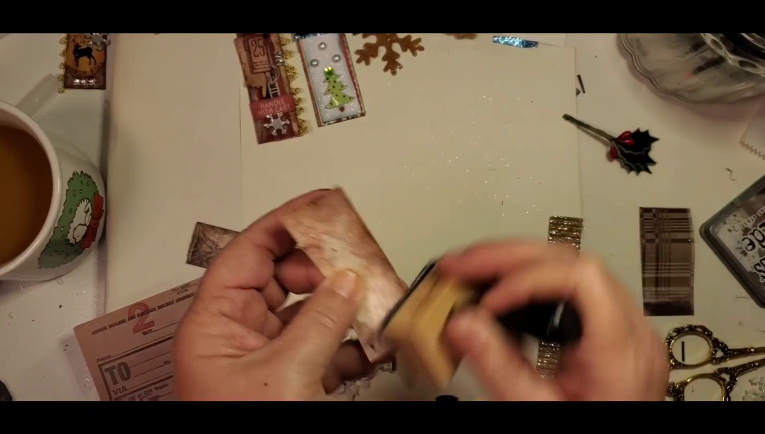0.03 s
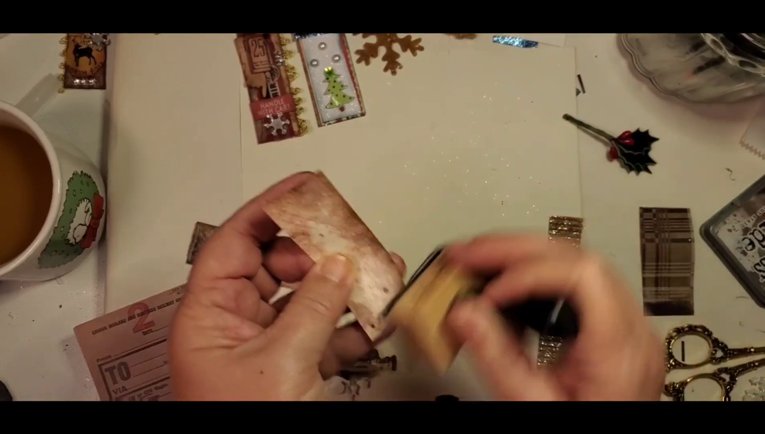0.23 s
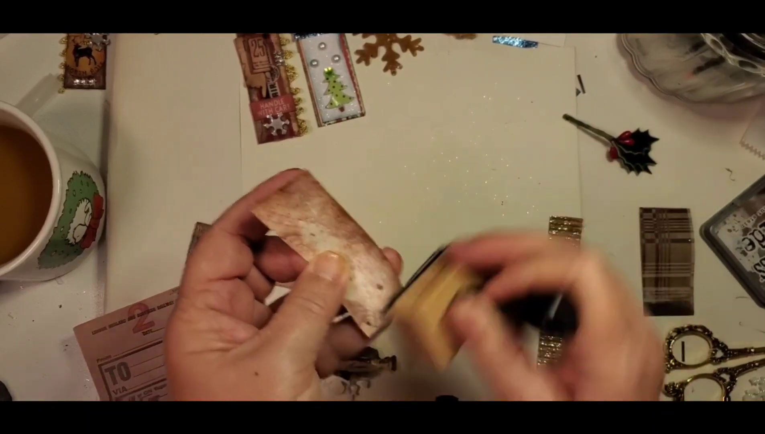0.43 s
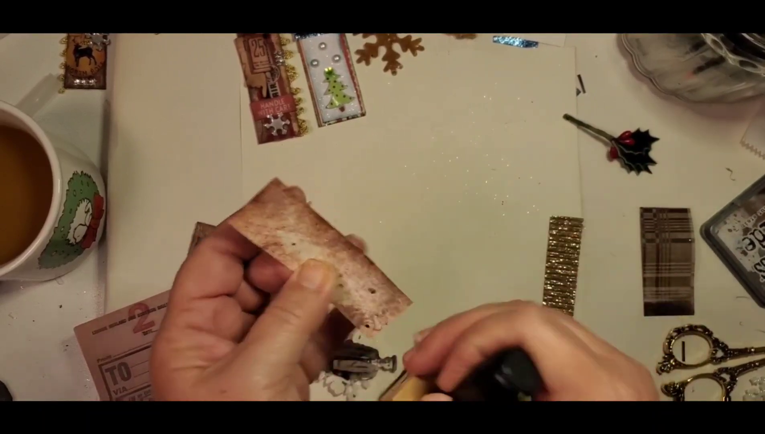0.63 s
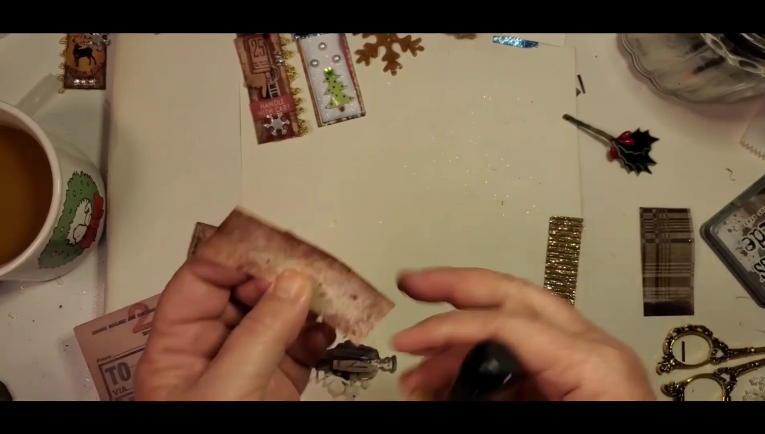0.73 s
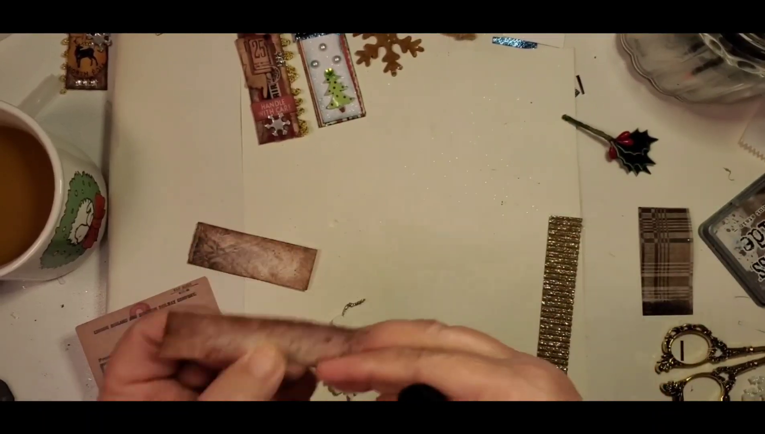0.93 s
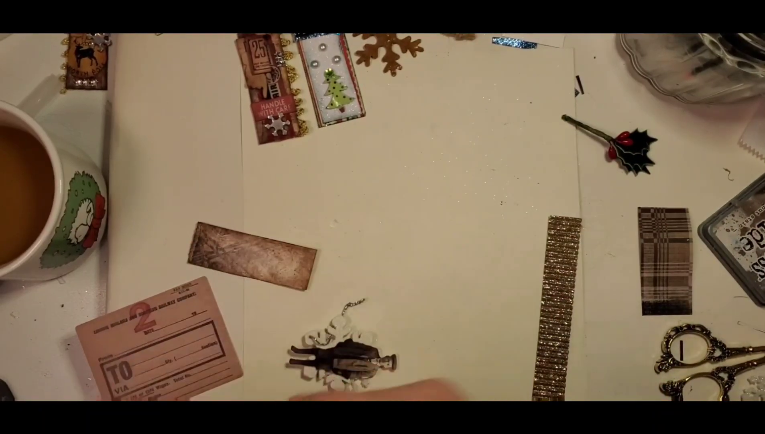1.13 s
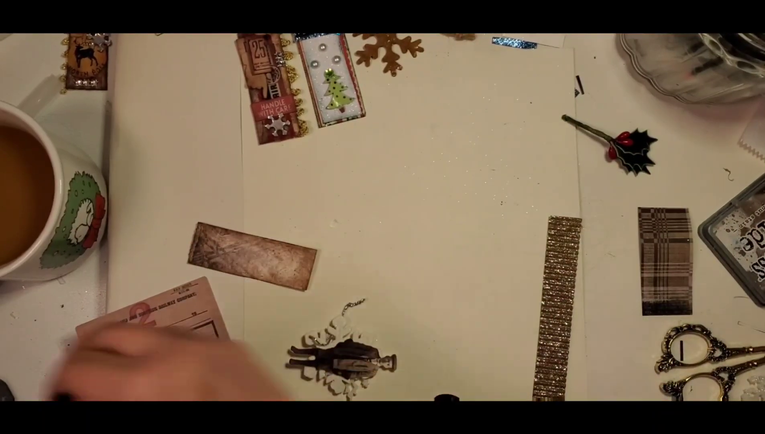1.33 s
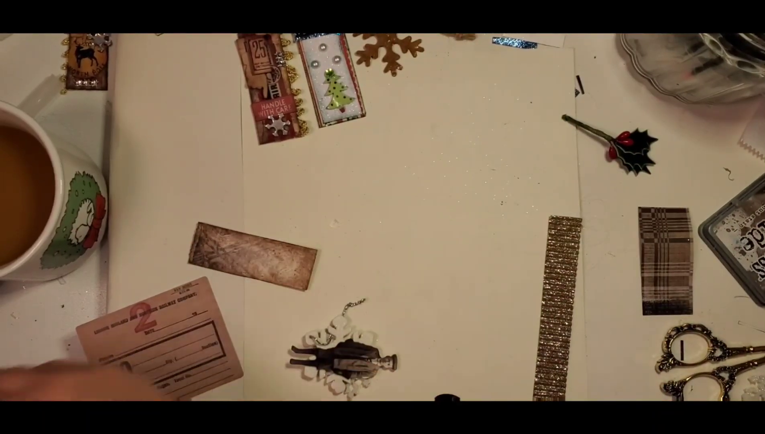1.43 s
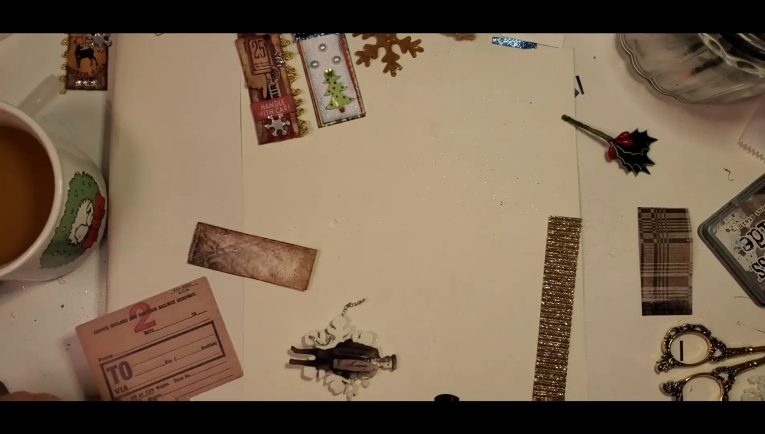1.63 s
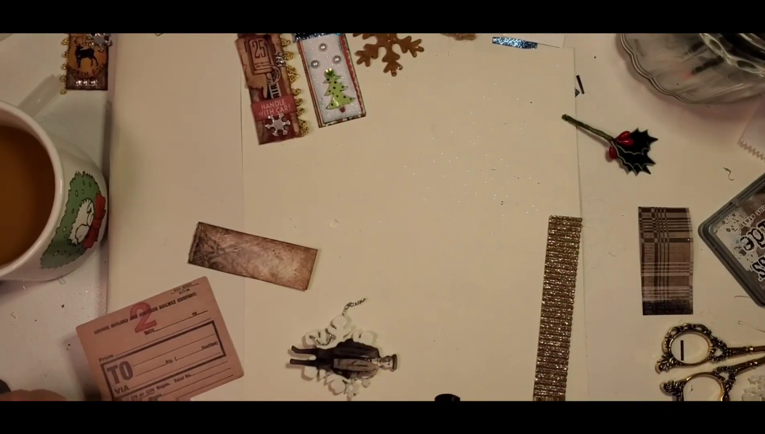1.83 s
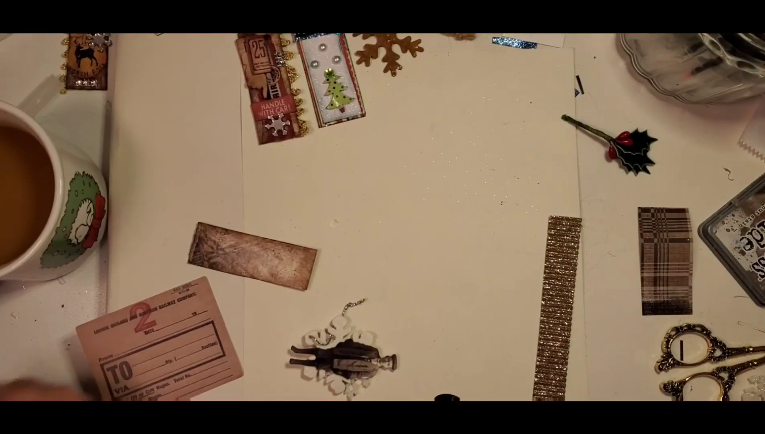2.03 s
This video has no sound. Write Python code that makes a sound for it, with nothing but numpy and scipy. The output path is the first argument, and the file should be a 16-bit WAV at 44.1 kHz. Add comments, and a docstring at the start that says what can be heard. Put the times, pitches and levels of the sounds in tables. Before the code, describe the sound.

Four quick, crisp flicks of foam against a paper card, followed by faint paper handling.

```python
"""A foam blending tool flicks four times over the edge of a small paper card, above a craft table.
Each stroke hisses along the paper, catches, and lets the card snap free with a bright crackle
and a short, low flex. Then hands and paper slide and rustle softly at the table's edge, with a few
dull bumps. A small room answers it all, over a bed of faint room noise and mains hum."""
import sys
import numpy as np
from scipy import signal
from scipy.fft import rfft, irfft
from scipy.io import wavfile
from scipy.ndimage import uniform_filter1d

SR = 44100
rng = np.random.default_rng(int(sys.argv[2]) if len(sys.argv) > 2 else 0)


def output_pcm(signal):
    """Save a mono or channel-first signal as 16-bit PCM at the path in sys.argv[1].

    Samples are clipped to [-1, 1] before scaling.
    """
    pcm = np.clip(np.atleast_2d(signal).T, -1, 1) * 32767
    wavfile.write(sys.argv[1], SR, np.round(pcm).astype(np.int16))


N = 92610
T = np.arange(N) / SR
HZ = np.fft.rfftfreq(4096, 1 / SR)

# The flicks. Each row: release time and crackle length in seconds, snap and flex gains in dB,
# EQ at 1.5, 4 and 12 kHz in dB, rub length in seconds, rub gain in dB, leftward pan in dB.
STROKES = [(0.0794, .0042, -20.5, -11, -6, 2.5, 2.5, .044, -44, -1),
           (0.2655, 0.0038, -18.5, -3.5, -8, -1.5, -2.5, 0.05, -49.5, -1),
           (.4613, 0.004, -23, 2, -1.5, -6.5, 1.5, 0.049, -47, -1),
           (0.6565, .0016, -23, -1.5, 1, -9.5, -2, 0.051, -48.5, -0.5)]
# Tone of the snap. Each row: frequency in Hz, gain in dB.
SNAP_EQ = [(100, -27), (400, -10), (850, -19.5), (1500, -6), (2200, -10), (3500, -1.5), (5600, -1.5),
           (9500, 0), (13000, 1), (15500, -5.5)]
# The card's resonances. Each row: centre in Hz, width in Hz, boost in dB.
CARD_PEAKS = [(1120, 170, 6), (1587, 290, 8.5), (1869, 290, 8), (2560, 240, 12), (2975, 170, 5.5),
              (3706, 900, 4.5), (4140, 480, 3), (6800, 640, 4.5), (9600, 820, 2.5), (12100, 600, 3.5)]
# What each stroke's grip brings out. Each row: two peaks, with centre and width in Hz, boost in dB.
GRIP_PEAKS = [
    [(1680, 400, 9.5), (5000, 340, 7.5)],
    [(3680, 1000, 6), (8800, 1800, 4.5)],
    [(2600, 170, 0.5), (9620, 600, 4)],
    [(3420, 700, 9), (9280, 1400, 6.5)],
]
# The whole card bending. Each row: pitch in Hz, level in dB, 60 dB decay time in seconds.
FLEX_MODES = [(210, -46.5, 0.024), (441, -36, .022), (513, -34.5, 0.006), (680, -39.5, .02)]
# The card's edge ticking on the tool. Each row: start in seconds, gain in dB, cutoff in Hz.
EDGE_TICKS = [(0.0794, -31.5, 2000), (0.4687, -27.5, 8900), (0.6626, -32.5, 8850)]
# Where the card sits in the stereo image. Each row: frequency in Hz, leftward pan in dB.
CARD_PAN = [(200, 4.5), (500, 6), (2300, 7.5), (5500, 3.5), (9000, 1), (14000, 4)]
# Tone of foam on paper. Each row: frequency in Hz, gain in dB.
RUB_EQ = [(200, -34.5), (1000, -26), (2200, -22), (3600, -10), (5200, -11), (8000, -5.5), (12500, 0),
          (15500, -3)]
# Paper sliding under the hands. Each row: time in seconds, level in dB.
SLIDE_ENVELOPE = [(0, -62), (.04, -60), (.06, -71.5), (.73, -85), (.77, -80), (.81, -83), (.96, -77.5),
                  (1.014, -70.5), (1.078, -72), (1.118, -65), (1.154, -69.5), (1.252, -67.5), (1.28, -77.5),
                  (1.385, -80.5), (1.416, -62), (1.452, -59.5), (1.48, -71.5), (1.52, -72), (1.57, -73),
                  (1.63, -89), (1.83, -100), (1.87, -71.5), (1.92, -74), (2.02, -85.5), (2.08, -81.5)]
# Tone of the slide. Each row: frequency in Hz, gain in dB.
SLIDE_EQ = [(200, -13), (800, -12), (1400, -5.5), (2300, -8.5), (4200, -0.5), (5300, -6.5), (6600, -2),
            (8700, -2.5), (12500, -0.5), (15500, -4)]
# Soft rustles. Each row: start, attack and length in seconds, level in dB, centre in Hz,
# width in octaves, leftward pan in dB.
RUSTLES = [(-.02, .03, 0.17, -60, 350, 0.31, 4), (0.727, .035, 0.093, -71.5, 2280, .25, 3),
           (0.974, 0.29, 0.42, -78.5, 1287, 0.2, 14.5), (1.24, 0.0048, 0.024, -62, 4830, 0.32, 4),
           (1.278, 0.0017, 0.18, -68.5, 3080, 0.3, 18.5), (1.277, 0.072, .37, -72.5, 1877, 0.23, 16.5),
           (1.257, 0.095, 0.58, -82, 810, 0.38, 12.5), (1.468, 0.075, .14, -68.5, 6760, 0.25, 14.5),
           (1.478, 0.077, .15, -68.5, 12600, 0.49, 7), (1.84, 0.015, 0.12, -72, 1450, 0.71, 11.5),
           (1.84, 0.058, .24, -69, 354, 0.42, 13), (0.976, 0.35, 0.46, -71, 346, 0.34, 10.5)]
# Table bumps. Each row: start in seconds, thud and tick gains in dB, tick cutoff in Hz,
# leftward pan in dB.
BUMPS = [(1.2435, -50.5, -67, 6000, 6.5), (1.279, -78, -62.5, 4000, 6), (1.837, -56, -62.5, 1389, 6),
         (1.862, -62, -67.5, 2987, 10), (1.925, -62, -70, 2980, 11)]
# The table's thud. Each row: pitch in Hz, level in dB, 60 dB decay time in seconds.
TABLE_MODES = [(104, -9, .15), (197, -14, 0.14), (339, -2.5, 0.077), (384, -2, .06), (496, -35, 0.099)]
# The table top shuddering under the hands. Each row: start in seconds, gain in dB.
SHUDDERS = [(1.841, -55.5), (1.859, -55.5)]
# The shudder's low ring. Each row: pitch in Hz, level in dB, 60 dB decay time in seconds.
SHUDDER_MODES = [(95.6, 2.5, 0.11), (175, -5.5, 0.042)]
# Stereo image of close sounds. Each row: frequency in Hz, left-right likeness from 0 to 1.
NEAR_LIKENESS = [(300, 0.99), (2000, 0.8), (5000, 0.3), (9000, 0.15), (14000, 0)]
# Stereo image of the room. Each row: frequency in Hz, left-right likeness from 0 to 1.
ROOM_LIKENESS = [(150, 0.8), (550, 0.75), (1650, 0.085), (15000, 0.038)]
# Early reflections. Each row: delay in seconds, linear gain.
ECHOES = [(.0052, 0.049), (0.0129, 0.11), (0.0161, 0.072)]
# Length of the reverb tail. Each row: frequency in Hz, 60 dB decay time in seconds.
ROOM_DECAY = [(200, 0.37), (530, 0.21), (1500, 0.2577), (3700, 0.2362), (9700, 0.19), (15000, 0.1357)]
# Tone of the tail. Each row: frequency in Hz, gain in dB.
ROOM_EQ = [(150, -2.5), (450, -1), (850, 4.5), (1700, -4), (4000, -3), (8000, -0.5), (15000, 0.5)]
# Tone of the room noise. Each row: frequency in Hz, gain in dB.
FLOOR_EQ = [(15, -49), (25, -17), (123, 0.5), (229, -18), (363, -15), (439, -32), (516, -22.5),
            (5570, -36), (9070, -34.5), (14800, -38), (16000, -54.5)]

CATCH_S, CATCH_DB, SNAP_FALL_S, FLEX_AFTER_S = 0.0032, -21, 0.0011, 0.0013
EDGE_TICK_S, BUMP_TICK_S, PUSH_S = 0.0005, 0.0021, 0.00059
RUB_RISE_S, RUB_SWELL = 0.014, 0.25
RETURN_AFTER_S, RETURN_WIDTH_S, RETURN_DB = 0.13, 0.013, -62.5
SLIDE_PAN_DB, RIGHT_LAG_S = 6.5, 0.000055
ROOM_DB, ROOM_ONSET_S, FLOOR_DB = -9, 0.0075, -71
HUM_HZ, HUM_DB, HUM_WAVER = 119.9, -72, 0.34


def card_snaps():
    """The card's edge catches, crackles free of the foam, flexes back and sometimes ticks on the tool."""
    card_eq = curve(SNAP_EQ) + peaks(CARD_PEAKS)
    out = np.zeros((2, N))
    for stroke, grip in zip(STROKES, GRIP_PEAKS):
        start, length, snap_db, flex_db, mid_db, bite_db, top_db, _, _, pan_db = stroke
        stroke_eq = curve([(700, 0), (1500, mid_db), (4000, bite_db), (8000, 0), (12000, top_db)])
        slips = crackle(start, length, SNAP_FALL_S, catch=amp(CATCH_DB))
        snap = equalise(slips, card_eq + peaks(grip) + stroke_eq)
        flex = ring(FLEX_MODES, start + FLEX_AFTER_S)
        out += pan(pan_db) * (amp(snap_db) * snap + amp(flex_db) * flex)
    for start, db, cutoff in EDGE_TICKS:
        out += amp(db) * equalise(crackle(start, EDGE_TICK_S, EDGE_TICK_S), card_eq + high_cut(cutoff))
    return out


def crackle(start, length, fall, catch=0):
    """One sharp slip leads a burst of tiny ones; catch is the gain of the build-up before it."""
    lead, size = 512, 2048
    t = (np.arange(size) - lead) / SR
    envelope = np.where(t < 0, catch * np.exp(-abs(t) / CATCH_S),
                        np.exp(-np.maximum(t - length, 0) / fall))
    slips = friction(grain_db=3, size=size) * envelope
    slips[:, lead] += 0.62  # the leading slip
    spectrum = rfft(slips)
    power = uniform_filter1d(abs(spectrum) ** 2, size=21, axis=1)
    slips = irfft(spectrum / np.sqrt(power + 1e-12), size)  # even out the tone
    slips *= np.linalg.norm(envelope) / np.linalg.norm(slips, axis=1, keepdims=True)
    at = round(start * SR) - lead
    return np.pad(slips, ((0, 0), (at, N - size - at)))


def foam_rubs():
    """Foam hisses along the paper, swelling up to each release, and brushes it on the way back."""
    level = np.zeros((2, N))
    for release, *_, length, db, pan_db in STROKES:
        t = T - release
        press = np.clip((t + length) / RUB_RISE_S, 0, 1) * (1 + RUB_SWELL * t / length) * (t < 0)
        brush_back = np.exp(-0.5 * ((t - RETURN_AFTER_S) / RETURN_WIDTH_S) ** 2)
        level += pan(pan_db) * (amp(db) * press + amp(RETURN_DB) * brush_back)
    return equalise(friction(grain_db=2.5) * level, curve(RUB_EQ))


def friction(grain_db, size=N):
    """Countless tiny slips of paper fibres, in uneven clumps."""
    clumps = unit(uniform_filter1d(rng.standard_normal(size), size=14))
    return unit(stereo_noise(size, NEAR_LIKENESS) * amp(grain_db * np.clip(clumps, -2, 2)))


def ring(modes, start):
    """Damped modes set off by a short, soft push."""
    t = np.maximum(T - start, 0)
    ringing = sum(amp(db - 60 * t / t60) * np.cos(2 * np.pi * hz * t) for hz, db, t60 in modes)
    push = signal.windows.gaussian(129, PUSH_S * SR / 2)
    return np.convolve(ringing * (T >= start), push / push.sum(), "same")


def paper_handling():
    """Paper slides with a thin hiss; hands and sheets rustle, each in its own band."""
    slide_level = amp(np.interp(T, *np.transpose(SLIDE_ENVELOPE)))
    out = pan(SLIDE_PAN_DB) * slide_level * equalise(friction(grain_db=4), curve(SLIDE_EQ))
    for start, attack, length, db, centre, octaves, pan_db in RUSTLES:
        envelope = np.interp(T - start, [0, attack, length], [0, 1, 0])
        band_eq = np.maximum(-4.3 * (np.log2((HZ + 1) / centre) / octaves) ** 2, -50)
        out += pan(pan_db) * amp(db) * envelope * equalise(friction(grain_db=4), band_eq)
    return out


def table_bumps():
    """Light contacts give a papery tick and a dull thud; the table top shudders under the hands."""
    out = np.zeros((2, N))
    for start, thud_db, tick_db, cutoff, pan_db in BUMPS:
        tick = equalise(crackle(start, BUMP_TICK_S / 2, BUMP_TICK_S), high_cut(cutoff))
        out += pan(pan_db) * (amp(thud_db) * ring(TABLE_MODES, start) + amp(tick_db) * tick)
    return out + sum(amp(db) * ring(SHUDDER_MODES, start) for start, db in SHUDDERS)


def room(x):
    """A small room returns a few early reflections and a short diffuse tail."""
    hz, t, bands = signal.stft(stereo_noise(SR // 2, ROOM_LIKENESS), SR, nperseg=256)
    decay_db = curve(ROOM_EQ, hz)[:, None] - 60 * t / curve(ROOM_DECAY, hz)[:, None]
    tail = signal.istft(bands * amp(decay_db), SR, nperseg=256)[1]
    tail *= np.minimum(np.arange(tail.shape[1]) / SR / ROOM_ONSET_S, 1) ** 2
    tail *= amp(ROOM_DB) / np.linalg.norm(tail[0])
    for delay, gain in ECHOES:
        tail[:, round(delay * SR)] += gain
    return signal.fftconvolve(x, tail, axes=1)[:, :N]


def room_per_stroke(x):
    """Each stroke rings in the same small room, with a freshly drawn noise tail."""
    zone = np.searchsorted([release + RETURN_AFTER_S / 2 for release, *_ in STROKES], T)
    return sum(room(x * (zone == k)) for k in range(len(STROKES) + 1))


def background():
    """Faint room noise and a mains hum that wavers in level."""
    noise = equalise(stereo_noise(N, ROOM_LIKENESS), curve(FLOOR_EQ))
    waver = unit(signal.resample(rng.standard_normal(32), N))
    hum = unit((1 + HUM_WAVER * waver) * np.sin(2 * np.pi * HUM_HZ * T))
    return amp(FLOOR_DB) * noise + amp(HUM_DB) * hum


def amp(db):
    """Decibels to gain."""
    return 10 ** (np.asarray(db) / 20)


def unit(x):
    """Scales to rms 1."""
    return x / np.sqrt(np.mean(x ** 2) + 1e-20)


def pan(db):
    """Left and right gains, with the left louder by db."""
    return amp(np.outer([0.5, -0.5], db))


def curve(points, hz=HZ):
    """Joins breakpoints along a log-frequency axis."""
    freqs, values = np.transpose(points)
    return np.interp(np.log(hz + 1), np.log(freqs + 1), values)


def peaks(resonances):
    """EQ curve in dB with a bell at each resonance."""
    return sum(db / (1 + (2 * (HZ - centre) / width) ** 2) for centre, width, db in resonances)


def high_cut(hz):
    """EQ curve in dB that rolls off 12 dB per octave above hz."""
    return -10 * np.log10(1 + (HZ / hz) ** 4)


def equalise(x, eq_db):
    """Shapes the tone with a minimum-phase filter of unit energy."""
    log_gain = np.log(amp(np.maximum(eq_db, -100)))
    mirrored = np.r_[log_gain, log_gain[-2:0:-1]]
    taps = np.fft.ifft(np.exp(np.conj(signal.hilbert(mirrored)))).real[:len(HZ)]
    return signal.oaconvolve(x, taps[None] / np.linalg.norm(taps), axes=1)[:, :N]


def stereo_noise(size, likeness):
    """White noise whose two channels are partly alike, band by band."""
    left, other = rfft(rng.standard_normal((2, size)))
    shared = np.clip(curve(likeness, np.fft.rfftfreq(size, 1 / SR)), 0, 1)
    right = shared * left + np.sqrt(1 - shared ** 2) * other
    return irfft(np.array([left, right]), size)


def scene():
    """The action sits slightly left of the microphones, so the right side hears it later."""
    hz = np.fft.rfftfreq(N, 1 / SR)
    card = irfft(rfft(card_snaps() + foam_rubs()) * pan(curve(CARD_PAN, hz)), N)
    near = card + paper_handling() + table_bumps()
    near[1] = irfft(rfft(near[1]) * np.exp(-2j * np.pi * hz * RIGHT_LAG_S), N)
    return near + room_per_stroke(near) + background()


def record(dry):
    """A steep low-pass trims the air above 16 kHz."""
    taps = signal.firwin(255, 16000, window=("kaiser", 8), fs=SR)
    return signal.oaconvolve(dry, taps[None], "same")


dry = scene()
out = record(dry)
output_pcm(out)
```